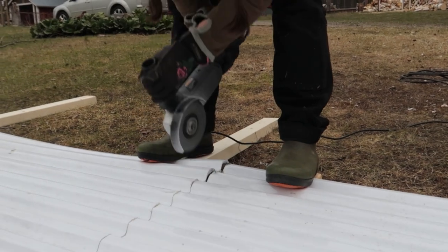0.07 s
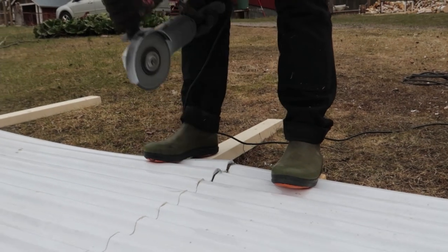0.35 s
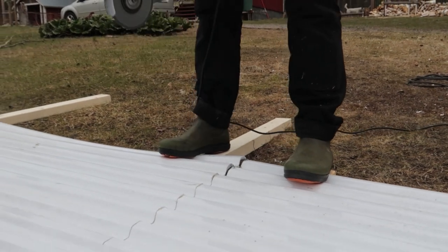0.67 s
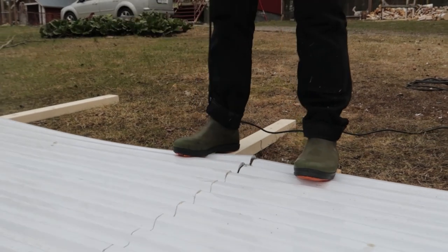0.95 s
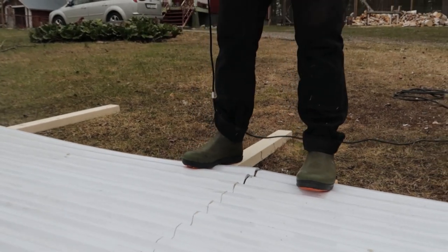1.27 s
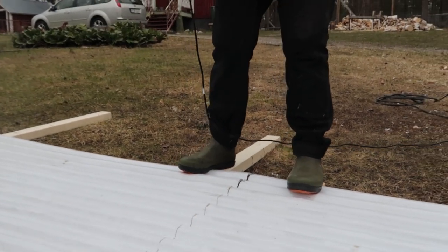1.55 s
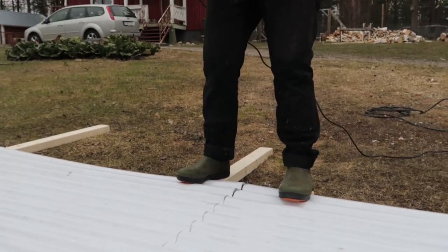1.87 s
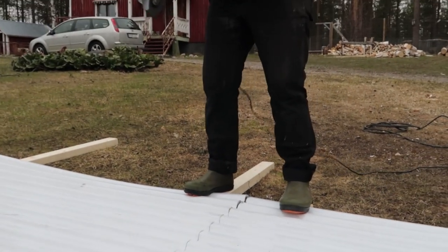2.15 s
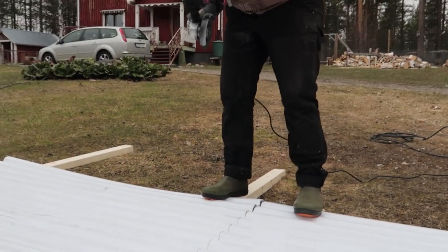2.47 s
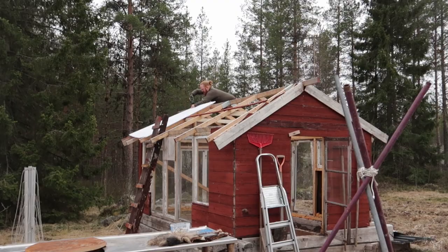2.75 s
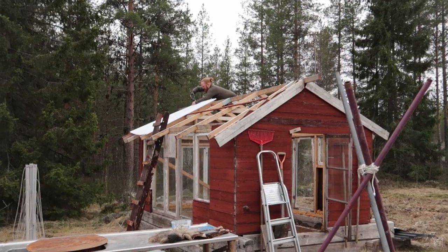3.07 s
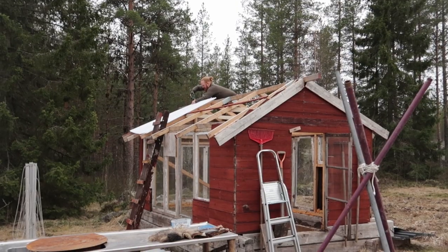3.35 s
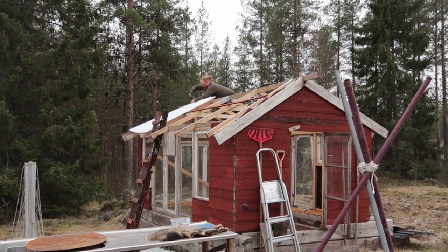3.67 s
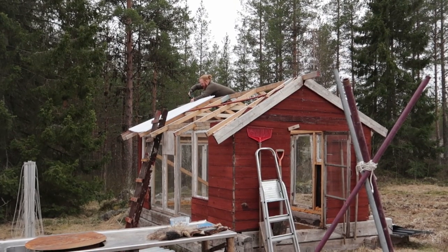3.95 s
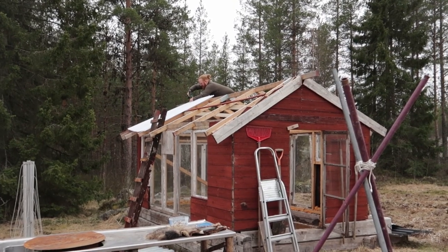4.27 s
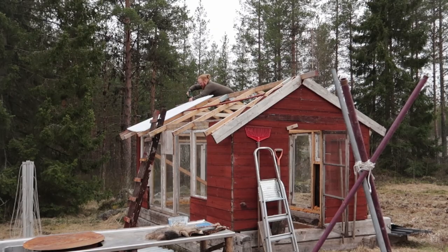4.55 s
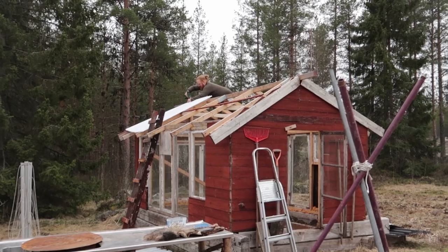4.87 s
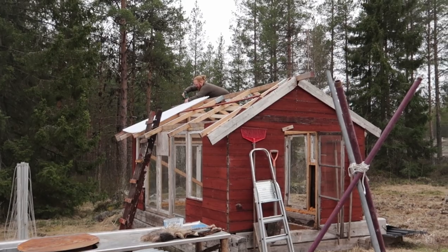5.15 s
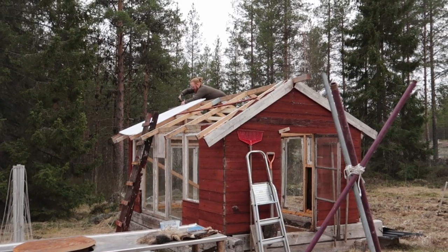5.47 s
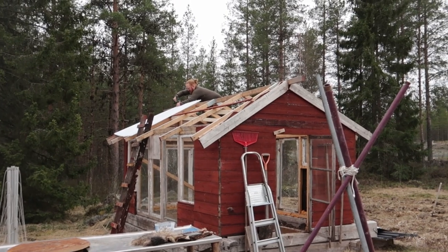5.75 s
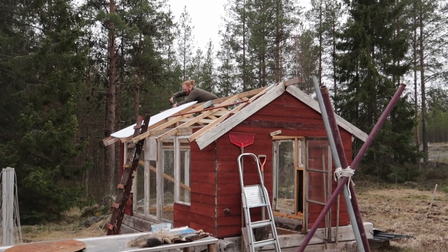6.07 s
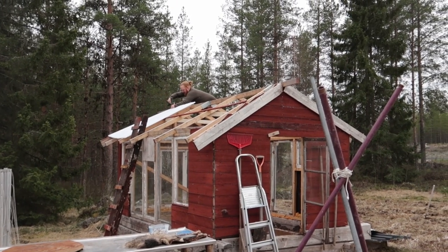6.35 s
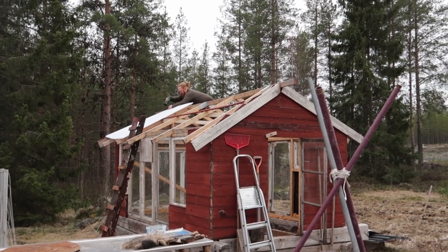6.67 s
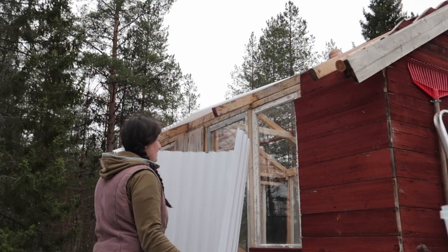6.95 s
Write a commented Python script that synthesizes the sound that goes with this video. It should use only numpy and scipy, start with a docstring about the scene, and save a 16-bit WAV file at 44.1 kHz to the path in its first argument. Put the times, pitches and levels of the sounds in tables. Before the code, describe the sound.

An angle grinder races briefly and coasts down, then a distant cordless driver sinks a screw and gives short bursts amid dull thumps.

```python
"""First an angle grinder races briefly as it is lifted from a plastic roof sheet: its motor hums, its
gears rattle and its fan rushes. Switched off, it coasts down, with one clack as it is handled. At 2.8 s
the scene jumps to a quiet forest yard. On a shed roof some way off, a cordless driver sinks a screw in
one long, whining run until it stalls, then gives seven short squeezes of the trigger. A few knocks and
dull thumps fall during and after this work, over the hush of the forest."""
import sys
import numpy as np
from scipy import signal
from scipy.fft import rfft, irfft, next_fast_len
from scipy.io import wavfile

SR = 44100
rng = np.random.default_rng(int(sys.argv[2]) if len(sys.argv) > 2 else 0)


def materialize(psi):
    """Save the field psi as 16-bit PCM at rate SR to the path in sys.argv[1].

    A 1-D psi becomes a single channel; in a 2-D psi each row is a channel.
    """
    bounded = np.clip(np.atleast_2d(psi).T, -1, 1)
    quanta = np.round(bounded * 32767).astype(np.int16)
    wavfile.write(sys.argv[1], SR, quanta)


N = 313092
TIME = np.arange(N) / SR


def grinder():
    """The whole grinder, close by: a rush of air and gears, the motor's tones and one clack."""
    speed = spindle_speed()
    slowed = np.clip((175 - speed) / 55, 0, 1)  # 0 when fast, 1 when slow
    rush = sheet_echoes(chatter(housing(grinder_rush(speed, slowed))))
    sound = rush + clack() + grinder_tones(speed, slowed)
    return reach_right_later(sound, lag_s=1.9e-5, above_hz=6000)


START_TURNS_HZ, TOP_TURNS_HZ, SWITCH_OFF_S = 171.4, 185.6, .4
def spindle_speed(bearing_drag_per_s=.199, fan_drag_per_s=.063):
    """Turns per second: rising until the switch is let go, then slowed by the bearings and the fan."""
    powered = np.interp(TIME, [0, SWITCH_OFF_S], [START_TURNS_HZ, TOP_TURNS_HZ])
    coast = np.exp(-bearing_drag_per_s * np.maximum(TIME - SWITCH_OFF_S, 0))
    return powered * coast / (1 + fan_drag_per_s / bearing_drag_per_s * (1 - coast))


# The tone colour of the rush when fast, when slow, and of its bass.
# Each row: frequency in Hz, relative level in dB.
FAST_RUSH_COLOUR = [(410, -39), (700, -9), (776, -12), (1150, -7.5), (1540, -2.5), (2160, 3), (2910, 2),
                    (3150, 3.5), (4770, -9.5), (5790, -14.5), (8320, -20.5), (12000, -20), (15500, -38)]
SLOW_RUSH_COLOUR = [(470, -35.5), (800, -3.5), (1160, -0.5), (1280, 4.5), (2000, -9), (2320, -1.5),
                    (2700, -4.5), (3130, -10), (4600, -12.5), (5680, -14), (8980, -21), (12200, -23.5),
                    (15500, -70)]
BASS_RUSH_COLOUR = [(40, -39.5), (100, -44), (250, -15), (400, -11), (600, -7.5)]
# How alike left and right sound up close. Each row: frequency in Hz, likeness (1 is the same).
CLOSE_LIKENESS = [(100, .92), (300, 0.97), (550, .998), (1150, 1), (1600, 1), (3000, 0.98), (4400, 0.72),
                  (6000, .8), (10000, .66), (15000, .6)]
def grinder_rush(speed, slowed, ticks_per_turn=14):
    """Loose gear teeth tick at random through the fan's air; both surge once per spindle turn."""
    ticks = (rng.random((2, 2, N)) < ticks_per_turn * speed / SR) * rng.choice([-1, 1], (2, 2, N))
    ticks = rms_one(ticks * from_db(1.5 * np.minimum(rng.exponential(1, N), 4)))
    throb = 1 + .069 * np.sin(turning(speed))
    noise = (.47 * ticks + .73 * white()) * throb * from_db(.74 * drift(40))

    def band(low_hz, high_hz):
        fast = coloured(noise, FAST_RUSH_COLOUR, CLOSE_LIKENESS, low_hz, high_hz)
        slow = coloured(noise, SLOW_RUSH_COLOUR, CLOSE_LIKENESS, low_hz, high_hz)
        return fast + (slow - fast) * slowed

    bass = from_db(-11.5) * coloured(noise, BASS_RUSH_COLOUR, CLOSE_LIKENESS, 58, 710)
    low, middle, hiss = rush_gains(speed)
    return (low * (band(728, 1586) + bass) + middle * band(1613, 3770)
            + hiss * lean_left(.5) * band(3875, 16100))


# The low, middle and hissing parts of the rush. Each row: relative level at top speed in dB,
# dB lost each time the speed halves, change in dB while held low, change in dB while turned away.
RUSH_PARTS = [(-23, 4, -2.5, 0), (-17.5, 6.5, -0.8, -1.5), (-21, 10, -2.1, -1.5)]
def rush_gains(speed):
    """Each part of the rush fades as the tool slows, and changes with the way it is held."""
    halvings = np.log2(TOP_TURNS_HZ / speed)
    muffled_db = -2 * (1 - ramp(0, .065))  # the rush starts a little softer for its first moments
    held_low = 1 - ramp(.24, .12)  # the tool comes up off the sheet
    turned_away = ramp(CLACK_S, .0097) - ramp(CLACK_S + .13, .13)
    return [from_db(db - loss_db * halvings + muffled_db + low_db * held_low + turned_db * turned_away)
            for db, loss_db, low_db, turned_db in RUSH_PARTS]


# Pitches at which the grinder's shell rings. Each row: pitch in Hz, width in Hz, boost in dB,
# time when strongest in seconds, fade time either side in seconds.
HOUSING_RINGS = [(1126, 110, 5.5, 1.16, 0.51), (1280, 360, -18, -1.5, .3), (1530, 120, -5, 1, 0.37),
                 (1744, 100, 7.5, 1.17, 0.55), (1800, 200, -7.5, -3.5, .17), (2000, 120, -5, 18, .25),
                 (2190, 140, 2, -0.2, 0.3), (2410, 160, 5.5, 1.7, 0.36), (2530, 110, 4.5, 2.3, 0.24),
                 (2900, 220, -10, -0.3, .55), (3090, 140, 6, 1.23, 0.25), (2660, 170, 1, 0.7, 0.31),
                 (3150, 130, 7.5, 1.75, 0.42), (3410, 130, 9, 2.45, 0.45), (3396, 170, 6.5, -0.5, .3),
                 (3620, 200, 0, 5.5, 0.21), (3800, 100, 9, 2.62, .3), (3980, 40, 14, 2.62, .15),
                 (4335, 45, 13, 2.42, .13), (3100, 110, 5, 2.35, .1), (6360, 80, 13, 2.35, .03),
                 (4000, 140, 5.5, 1.8, .3), (4600, 200, -4.5, 2.5, .7), (1215, 70, -8, 2.6, .3),
                 (5080, 70, 5, 2.5, .25), (8350, 250, 6, 1.65, .25), (5720, 90, 6, 2.6, 0.3),
                 (8500, 270, 6, 0.1, 0.3), (7020, 430, 6, 1.9, 0.085), (3160, 80, 6, 1.0, .2),
                 (2175, 50, 5, .2, .12)]
def housing(rush):
    """As the tool swings, each ring of its shell points toward the microphone or away from it."""
    rings = sum((from_db(db + .2) - 1) * swell(s, fade_s) * resonance(rush, hz, width)
                for hz, width, db, s, fade_s in HOUSING_RINGS)
    rush = rush + rings
    return rush + added_ring(rush, hz=711, width_hz=33, db=11.7)  # the disc guard rings too


# Moments when the gears chatter harder.
# Each row: time in seconds, fade time either side in seconds, ringing pitch in Hz, boost in dB.
GEAR_CHATTERS = [(0.218, 0.018, 2170, 7.5), (0.402, 0.011, 2550, 6.5), (0.478, 0.015, 2530, 7),
                 (0.672, .008, 2180, 4), (0.84, 0.0076, 3150, 7.5), (2.326, 0.0099, 3070, 10.5),
                 (2.473, 0.011, 3160, 13.5), (2.632, 0.0063, 2560, 2.5), (2.743, 0.0043, 2590, -1)]
def chatter(rush, surge_db=.86):
    """With each chatter the whole rush surges and the shell rings at one pitch."""
    surge = (from_db(surge_db) - 1) * rush
    return rush + sum(swell(s, fade_s) * (surge + added_ring(rush, hz, width_hz=160, db=db))
                      for s, fade_s, hz, db in GEAR_CHATTERS)


# How late the echo off the roof sheet arrives. Each row: time in seconds, delay in seconds.
SHEET_DELAY = [(0, 0.00041), (.2, 0.00046), (.45, 0.00079), (1, 0.0011), (1.5, .00126), (2.8, 0.0015)]
# Echoes off the sheet and things further away. Each row: multiple of that delay, relative level in dB.
NEAR_ECHOES = [(1, -16.5), (3.7, -17.5), (6.002, -19.5)]
def sheet_echoes(rush):
    """The rush with its echoes, which arrive later and later as the tool is raised."""
    delay_s = in_time(SHEET_DELAY)
    echoes = sum(from_db(db) * delayed(rush, multiple * delay_s) for multiple, db in NEAR_ECHOES)
    return from_db(-2.5) * (rush + echoes)


# The hum of the motor's spinning core. Each row: time in seconds, relative level in dB.
MOTOR_HUM = [(0.0, -28), (0.06, -23.5), (0.22, -20.5), (0.6, -31), (0.7, -38), (1.04, -35.5), (1.27, -29),
             (1.95, -27.5), (2.2, -36.5), (2.78, -42.5)]
# Weaker tones. Each row: multiple of the spindle speed, level in dB when fast, level in dB when slow.
SPINDLE_TONES = [(1, -50.5, -49.5), (2, -51.5, -64), (5, -44, -46), (6, -40.5, -42), (12, -30.5, -47.5)]
# Tones of the loosely meeting gear teeth. Each row: multiple of the spindle speed, level in dB when fast.
TOOTH_TONES = [(15, -33), (18, -33), (30, -46), (56, -49.5)]
# Rings of the guard and body that the spindle tones slide through, then those the whistle slides through.
# Each row: pitch in Hz, width in Hz, boost in dB.
GUARD_RINGS = [(139, 14, 6.5), (224, 24, 23), (722, 49, 15)]
WHISTLE_RINGS = [(15400, 900, 19), (14400, 400, -4), (13150, 900, 11), (11900, 1300, 15.5),
                 (10650, 450, -7), (9800, 600, 19.5)]
def grinder_tones(speed, slowed):
    """The motor hums at three times the spindle speed; other tones swell as they slide through rings."""
    angle = turning(speed * (1 + .0008 * drift(15)))
    tones = from_db(in_time(MOTOR_HUM) - .86 + drift(9.9)) * np.sin(3 * angle)
    for multiple, fast_db, slow_db in SPINDLE_TONES:
        db = fast_db + (slow_db - fast_db) * slowed + boost_db(multiple * speed, GUARD_RINGS)
        tones += from_db(db + 1.3 * drift(30)) * np.sin(multiple * angle + .24 * drift(28))
    for multiple, db in TOOTH_TONES:
        tones += from_db(db - 9.9 * slowed + 1.7 * drift(32)) * np.sin(multiple * angle + 1.3 * drift(64))
    whistle_db = -56 + boost_db(93 * speed, WHISTLE_RINGS) + 2 * drift(20)
    whistle = from_db(whistle_db) * np.sin(93 * angle + .3 * drift(50))
    return np.sqrt(2) * (tones + whistle)


CLACK_S = 2.0111
# The notes in the clack. Each row: pitch in Hz, relative level in dB, seconds to fade by 60 dB.
CLACK_NOTES = [(470, -8, .04), (800, -8, .018), (1280, -1, .016), (1800, -3, .014), (5500, -7, .003),
               (10500, -5, .003)]
def clack():
    """One sharp blow as the grinder is handled."""
    blow = cut(struck(CLACK_S, db=-5.5, notes=CLACK_NOTES, brightness_hz=14000), 220, "high")
    return reach_right_later([blow, blow], lag_s=5e-5)


# In the long run the screw bites, tightens and seats (sinks fully home); then the motor stalls.
BITE_S, TIGHT_S, SEATED_S, STALL_S = 2.89, 3.62, 4.02, 4.118
TIGHTEN_TAKES_S, SEAT_TAKES_S, BRAKE_S = .14, .13, .027
# Rings of the driver's case and the boards under it. Each row: pitch in Hz, width in Hz, boost in dB.
CASE_RINGS = [(608, 44, 3), (1000, 60, 7.5), (1594, 44, 8.5), (3320, 210, 4.5), (4170, 110, 6),
              (5430, 110, 5), (6400, 460, 5.5), (7500, 180, 3)]
def driver():
    """The whole driver: whirr, squeezes and grinding ring its case; whine and roof drone join them."""
    gear_hz, squeeze_gain = squeezes()
    labouring = ramp(TIGHT_S, TIGHTEN_TAKES_S) * (TIME < TRIGGER_SQUEEZES[0][0])
    noise = white() * from_db((.5 + 1.5 * labouring) * drift(160))  # grainier under load
    up_to_speed = np.minimum(gear_hz / 580, 1)
    sound = whirr(noise, squeeze_gain, up_to_speed)
    sound += squeeze_tones(gear_hz, squeeze_gain * up_to_speed ** 2)
    sound += screw_grind()
    rings = sum(added_ring(sound, hz, width, db) for hz, width, db in CASE_RINGS)
    return sound + rings + long_run() + roof_drone(noise)


# The pitch of the gear whine in the long run. Each row: time in seconds, pitch in Hz.
WHINE_PITCH = [(2.96, 2880), (3.03, 3070), (3.16, 3213), (3.28, 3068), (3.55, 3010), (3.70, 2864),
               (3.83, 2915), (3.9, 2940), (3.98, 2886), (4.07, 2670), (4.16, 2337)]
def long_run():
    """The gears whine as the screw runs in; a lower, rougher tone takes over, and the screw squeals."""
    whine_hz = in_time(WHINE_PITCH)
    shaft_hz = whine_hz / 3
    shaft_angle = turning(shaft_hz * (1 + .002 * drift(30)))
    return gear_whine(shaft_angle, shaft_hz) + gear_strain(shaft_angle) + screw_squeal(shaft_angle)


def run_gain(free_db, bite_db, tight_db, seated_db):
    """A layer's gain in the long run: it steps as the screw bites, tightens and seats, then dies away."""
    load_db = (bite_db * ramp(BITE_S, .074) + tight_db * ramp(TIGHT_S, TIGHTEN_TAKES_S)
               + seated_db * ramp(SEATED_S, SEAT_TAKES_S))
    return from_db(free_db + load_db - 261 * np.clip(TIME - STALL_S, 0, 1))


# The tones in the whine. Each row: multiple of the gear shaft's speed, relative level in dB.
WHINE_TONES = [(1, -11), (3, -1.5), (3.17, -13), (4, -17), (4.17, -17), (5, -17), (5.83, -17), (6, -8),
               (6.13, -14), (9, -23), (10.2, -23), (11.05, -26), (11.6, -24)]
# Rings that the whine meets at top speed. Each row: pitch in Hz, width in Hz, boost in dB.
WHINE_RINGS = [(3210, 250, 3.5), (5360, 280, 10)]
def gear_whine(shaft_angle, shaft_hz):
    """Fast gears sing; the higher the tone, the more it wavers."""
    angle = shaft_angle + .039 * drift(55)
    whine = 0
    for multiple, db in WHINE_TONES:
        gain = from_db(db + boost_db(multiple * shaft_hz, WHINE_RINGS) + 2.5 * drift(26))
        whine += gain * np.sin(multiple * angle + .004 * multiple ** 2 * drift(90))
    return np.sqrt(2) * run_gain(-60.5, bite_db=6, tight_db=-14, seated_db=0) * whine


# The tones of gears under strain.
# Each row: multiple of the gear shaft's speed, relative level in dB, change in dB as the screw seats.
STRAIN_TONES = [(1, -5, -3), (2, 0.5, 2), (3, -9, -3), (4, -4, -2), (5.7, -13, -8), (6.4, -13, -8),
                (8, -10, -8)]
def gear_strain(shaft_angle):
    """The gears growl as the screw tightens, and get rougher still as it seats."""
    seated = ramp(SEATED_S, SEAT_TAKES_S)
    growl = 0
    for multiple, db, seated_db in STRAIN_TONES:
        gain = from_db(db + seated_db * seated + 4 * drift(55))
        growl += gain * np.sin(multiple * shaft_angle + .9 * (1 + seated) * drift(90))
    return np.sqrt(2) * run_gain(-80.5, bite_db=3, tight_db=17, seated_db=8) * growl


# The tones in the squeal. Each row: multiple of the gear shaft's speed, level in dB.
SQUEAL_TONES = [(2, -48.5), (4, -57)]
def screw_squeal(shaft_angle):
    """The screw squeals for a moment as it seats."""
    squeal = sum(from_db(db + 3 * drift(60)) * np.sin(multiple * (shaft_angle + .33 * drift(90)))
                 for multiple, db in SQUEAL_TONES)
    return np.sqrt(2) * swell(4.095, fade_s=.035) * squeal


def screw_grind(slips_per_s=900):
    """The tight screw grinds in the wood in many small slips."""
    gain = from_db(-58.5) * ramp(TIGHT_S, TIGHTEN_TAKES_S) * (1 - ramp(STALL_S, BRAKE_S))
    slips = (rng.random(N) < slips_per_s / SR) * rng.standard_normal(N)
    return gain * rms_one(cut(slips, (600, 3500), "band"))


# Short squeezes of the trigger. Each row: start in seconds, length in seconds,
# seconds to reach three-quarter speed, top gear pitch in Hz, relative level in dB.
TRIGGER_SQUEEZES = [(4.33, .089, .04, 600, -7), (4.582, .14, .053, 714, -1), (4.881, .15, .036, 718, -.5),
                    (5.218, .125, .037, 708, -.5), (5.52, .115, .046, 650, -2.5),
                    (5.845, .096, .034, 645, 0), (6.126, .115, .026, 628, 0)]
def squeezes(spin_up_s=.016, trigger_travel_s=.032, run_down_s=.6):
    """Gear pitch and gain: each squeeze spins the motor up, and the brake stops it on release."""
    gear_hz, gain = np.full(N, 300.), np.zeros(N)
    for start, length, rise_s, top_hz, db in TRIGGER_SQUEEZES:
        age = np.maximum(TIME - start, 0)
        released_s = np.clip(age - length, 0, 1)
        trigger = .5 + .5 * np.tanh((age - rise_s) / trigger_travel_s)
        hz = top_hz * (.5 + .5 * trigger) / (1 + released_s / run_down_s)
        gear_hz = np.where(age > 0, hz, gear_hz)
        gain += from_db(db) * (1 - np.exp(-age / spin_up_s)) * np.exp(-released_s / BRAKE_S)
    return gear_hz, gain


# The tones in each squeeze. Each row: multiple of the gear pitch, relative level in dB.
SQUEEZE_TONES = [(.5, -12), (1, 2), (1.17, -9), (1.5, -9), (2, -12), (2.33, -12), (3.5, -16), (4.5, -13),
                 (5, -10.5), (6, -18), (6.67, -13), (8.75, -19), (10.5, -26), (11.5, -26)]
def squeeze_tones(gear_hz, gain):
    """Slack between the teeth roughens the growling gear tones; the shed wall throws them back, dulled."""
    angle = turning(gear_hz * (1 + .012 * drift(45)))
    tones = 0
    for multiple, db in SQUEEZE_TONES:
        roughness = .25 + .11 * multiple
        tones += from_db(db + 3.2 * drift(71)) * np.sin(multiple * angle + roughness * drift(70))
    tones *= np.sqrt(2) * from_db(-52) * gain
    wall_echo = from_db(-10) * delayed([cut(tones, 900, "low")], .046)
    return tones + wall_echo


# The tone colour of the whirr's body and treble. Each row: frequency in Hz, relative level in dB.
BODY_COLOUR = [(180, -40), (300, -10), (350, -1.5), (463, -11), (545, -3.5), (695, -1.5), (871, -42),
               (980, -8), (1320, -8), (1650, -14.5), (2190, -7.5), (2600, -13), (3380, -43), (5720, -120)]
TREBLE_COLOUR = [(1240, -35), (2100, -8), (2710, 2.5), (3120, 0), (3700, -0.5), (4190, -1), (5060, -10),
                 (5500, -7.5), (5780, 1), (7450, -13.5), (8640, -14.5), (10600, -11.5), (12400, -27),
                 (14200, -30), (15000, -41)]
# How alike left and right sound from afar. Each row: frequency in Hz, likeness (1 is the same).
DISTANT_LIKENESS = [(380, 0.55), (700, 1), (2400, 0.97), (4400, 1), (8000, 0.7), (15000, .55)]
def whirr(noise, squeeze_gain, up_to_speed):
    """The driver's grainy noise; the motor's brushes scratch hardest as each squeeze starts."""
    scrape = from_db(-56 + 3 * drift(60)) * swell(3.05, fade_s=.06)  # the screw breaks into the wood
    body = run_gain(-58, bite_db=3.5, tight_db=2, seated_db=4) + scrape + from_db(-51) * squeeze_gain
    brushes = from_db(-56 + 7 * (1 - up_to_speed)) * squeeze_gain
    treble = run_gain(-57, bite_db=3, tight_db=-2, seated_db=1) + brushes
    return (body * coloured(noise, BODY_COLOUR, DISTANT_LIKENESS, 325, 2065)
            + treble * coloured(noise, TREBLE_COLOUR, DISTANT_LIKENESS, 2410, 15100))


# The tone colour of the drumming roof. Each row: frequency in Hz, relative level in dB.
DRONE_COLOUR = [(90, 1.5), (130, -1.5), (230, -5)]
def roof_drone(noise):
    """The roof drums under the hard-working driver."""
    gain = run_gain(-60, bite_db=4.5, tight_db=2, seated_db=-7)
    return gain * coloured(noise, DRONE_COLOUR, OUTDOOR_LIKENESS, 83.4, 234)


# Knocks on the roof. Each row: start in seconds, level in dB, brightness in Hz.
ROOF_KNOCKS = [(3.032, -39.5, 1400), (3.046, -46, 1300), (3.767, -42.5, 5000), (3.842, -44, 800),
               (4.088, -46, 600), (4.128, -39, 600), (4.150, -45, 600), (4.735, -43, 700),
               (5.037, -37.5, 650), (5.052, -39.5, 640), (6.966, -43, 900)]
# The roof's own notes. Each row: pitch in Hz, relative level in dB, seconds to fade by 60 dB.
ROOF_NOTES = [(549, 3.5, 0.058), (720, 4, 0.087), (850, -10, 0.027), (1084, 1, 0.053), (1680, 3.5, 0.031),
              (2654, 3, 0.024), (4060, 5, .015), (6800, 6, 0.0066)]
def knocks():
    """Each knock sets the roof ringing briefly."""
    return sum(struck(s, db, ROOF_NOTES, brightness_hz) for s, db, brightness_hz in ROOF_KNOCKS)


def snap(start_s=3.7667, fade_s=.022):
    """A short, bright crack of the plastic."""
    age = TIME - start_s
    gain = (age > 0) * from_db(-32.5 - 60 * np.clip(age / fade_s, 0, 3))
    return cut(gain * rng.standard_normal(N), (500, 5500), "band", order=1)


# Dull thumps. Each row: start in seconds, level in dB, number that multiplies the pitches below.
DULL_THUMPS = [(3.005, -38, 1), (4.470, -23, 1), (4.52, -34, 1), (4.778, -43.5, 1), (5.256, -20, 1.15),
               (6.794, -37, 1.4), (6.82, -38.5, 1.6), (6.922, -40, 1.3)]
# The notes in a thump. Each row: pitch in Hz, relative level in dB, seconds to fade by 60 dB.
THUMP_NOTES = [(102, -2, 0.042), (149, 4.5, 0.036), (205, 2.5, 0.036), (298, -6, 0.033), (616, -7, 0.027)]
def thumps(bounce_s=.024, bounce_loss_db=14):
    """Dull blows a little to the left, each followed by two weaker bounces."""
    blows = 0
    for s, db, pitch in DULL_THUMPS:
        notes = [(pitch * hz, note_db, fade_s) for hz, note_db, fade_s in THUMP_NOTES]
        for bounce in range(3):
            blows += struck(s + bounce * bounce_s, db - bounce * bounce_loss_db, notes, brightness_hz=470)
    return reach_right_later(blows * lean_left(1.7), lag_s=.00077)


def yard(sound, echo_db=-20):
    """Adds scattered dull echoes from the shed and the forest edge, different on each side."""
    dull, out = cut(sound, 2400, "low"), sound.copy()
    for side in range(2):
        for s in np.linspace(.012, .16, 12) * rng.uniform(.85, 1.15, 12):
            lag = round(s * SR)
            out[side, lag:] += from_db(echo_db - 60 * s) * dull[side, :-lag]
    return out


# The tone colour of the forest's hush. Each row: frequency in Hz, relative level in dB.
FOREST_COLOUR = [(15, -19), (25, -20), (86, -14), (118, -11), (150, -10.5), (354, -13.5), (427, -13),
                 (543, -22.5), (769, -17.5), (856, -21.5), (1150, -24.5), (2780, -30), (7280, -40.5),
                 (11200, -47.5), (15000, -53)]
# How alike left and right sound outdoors. Each row: frequency in Hz, likeness (1 is the same).
OUTDOOR_LIKENESS = [(100, 0.99), (200, 0.3), (400, .05), (15000, 0.055)]
def forest():
    """A soft, steady hush from all around."""
    return from_db(-53) * coloured(white(), FOREST_COLOUR, OUTDOOR_LIKENESS, 100.3, 15600)


# The tone colour of the rumble. Each row: frequency in Hz, relative level in dB.
RUMBLE_COLOUR = [(22, -9), (50, -4.5), (100, -2), (130, -7.5)]
def rumble(breeze_s=1.2, boom_s=.057):
    """The air rumbles, louder once a breeze comes up, and each thump leaves a low boom."""
    calm = 1 - ramp(breeze_s, .6)
    air = from_db(-55.5 - 8.5 * calm)
    booms = sum(from_db(db - 21) * ramp(s, .012) * np.exp(-np.abs(TIME - s) / boom_s)
                for s, db, _ in DULL_THUMPS)
    return (air + booms) * coloured(white(), RUMBLE_COLOUR, [(50, .93)], 22, 119.7)


def from_db(db):
    """Turns decibels into a gain, a number to multiply a sound by."""
    return 10 ** (np.asarray(db) / 20)


def rms_one(x):
    """Scales a sound to an average strength (rms) of 1."""
    return x / np.sqrt(np.mean(x ** 2) + 1e-20)


def in_time(rows):
    """Joins (time, value) points with straight lines."""
    return np.interp(TIME, *np.transpose(rows))


def at_hz(rows, hz):
    """Reads between (frequency, value) points, with octaves evenly spaced."""
    frequencies, values = np.transpose(rows)
    return np.interp(np.log(hz), np.log(frequencies), values)


def ramp(start_s, takes_s):
    """Goes from 0 to 1 in a straight line."""
    return np.clip((TIME - start_s) / takes_s, 0, 1)


def swell(peak_s, fade_s):
    """Rises smoothly to 1 and falls back, in a bell shape."""
    return np.exp(-((TIME - peak_s) / fade_s) ** 2)


def drift(rate_hz):
    """A smooth random wander, about 1 in size."""
    r = np.exp(-40 * np.pi * rate_hz / SR)
    slow = signal.lfilter([1], [1, -2 * r, r * r], rng.standard_normal(N // 20 + 4002))[4000:]
    return np.interp(np.arange(N) / 20, np.arange(len(slow)), rms_one(slow))


def turning(hz):
    """The angle turned so far at a changing speed."""
    return 2 * np.pi * np.cumsum(hz) / SR


def cut(x, hz, kind, order=2):
    """A filter that keeps the lows, the highs or one band."""
    return signal.sosfilt(signal.butter(order, hz, kind, fs=SR, output="sos"), x + 1e-18)


def resonance(x, hz, width_hz):
    """The part of a sound that rings near one pitch."""
    r = np.exp(-np.pi * width_hz / SR)
    feedback = [1, -2 * r * np.cos(2 * np.pi * hz / SR), r * r]
    return signal.lfilter(np.array([1, 0, -1]) * (1 - r * r) / 2, feedback, x)


def added_ring(x, hz, width_hz, db):
    """What to add to a sound to boost it by db at one pitch."""
    return (from_db(db) - 1) * resonance(x, hz, width_hz)


def boost_db(hz, rings):
    """How much a tone swells near pitches that ring."""
    return sum(db / (1 + ((hz - centre) / width * 2) ** 2) for centre, width, db in rings)


def struck(start_s, db, notes, brightness_hz):
    """One blow sets every note ringing; a softer contact lets less treble through."""
    age, out = TIME[:SR // 3], np.zeros(N + SR)
    ringing = 0
    for k, (hz, note_db, fade_s) in enumerate(notes):
        gain = from_db(note_db + rng.normal() - 60 * age / fade_s)
        ringing += (-1) ** k * gain * np.sin(2 * np.pi * hz * age)
    start = round(start_s * SR)
    out[start:start + len(age)] = from_db(db) * cut(ringing, brightness_hz, "low")
    return out[:N]


def white():
    """Two pairs of noises. In each, one is what left and right share, one is how they differ."""
    return rng.standard_normal((2, 2, N))


def coloured(noise, colour, likeness, low_hz, high_hz):
    """Shapes noise in third-octave bands, each with its own level and left-right likeness."""
    edges = np.geomspace(low_hz, high_hz, int(np.log2((high_hz / low_hz) ** 3)) + 2)
    out = 0
    for k, band in enumerate(zip(edges, edges[1:])):
        hz = np.sqrt(band[0] * band[1])
        alike = at_hz(likeness, hz)
        shares = np.sqrt([[1 + alike], [1 - alike]])
        out += from_db(at_hz(colour, hz)) * shares * cut(noise[k % 2], band, "band")
    shared, difference = out / np.sqrt(np.mean(out[0] ** 2))
    return np.array([shared + difference, shared - difference])


def delayed(x, s):
    """Each channel heard s seconds later; the delay may change over time."""
    return np.array([np.interp(TIME - s, TIME, side, left=0) for side in x])


def lean_left(db):
    """Gains that turn the left side up and the right side down."""
    return from_db([[db], [-db]])


def reach_right_later(x, lag_s, above_hz=1):
    """Sound from the left reaches the right microphone a moment later, above a given frequency."""
    size = next_fast_len(N + SR // 10)
    hz = np.arange(size // 2 + 1) * SR / size
    share = 1 - 1 / (1 + (hz / above_hz) ** 16)
    right = irfft(rfft(x[1], size) * np.exp(-2j * np.pi * hz * lag_s * share), size)
    return np.array([x[0], right[:N]])


def scene(jump_s=2.788):
    """The grinder close by, then the shed at a distance, over the hush of the forest."""
    knocking, hush = knocks(), forest()
    close = grinder()
    shed = yard(driver() + knocking + snap() + thumps())
    before_jump = np.clip((jump_s - TIME) / .004, 0, 1)
    return before_jump * close + (1 - before_jump) * shed + hush + rumble()


def record(dry, cutoff_hz=15700):
    """The very highest treble is cut off steeply."""
    return signal.sosfilt(signal.ellip(10, .1, 80, cutoff_hz, fs=SR, output="sos"), dry)


dry = scene()
out = record(dry)
materialize(out)
```